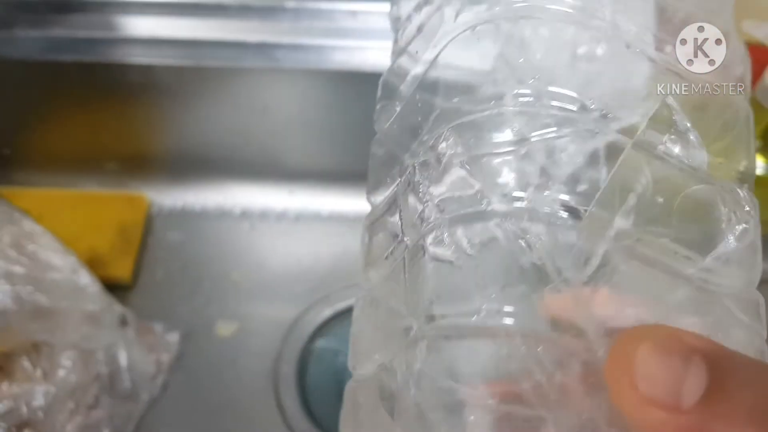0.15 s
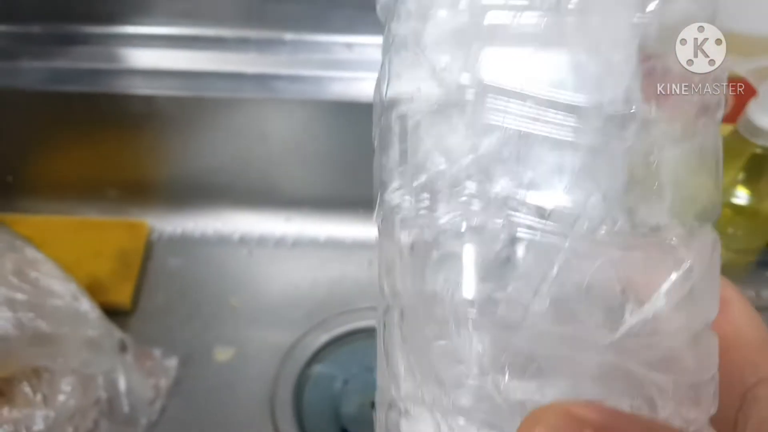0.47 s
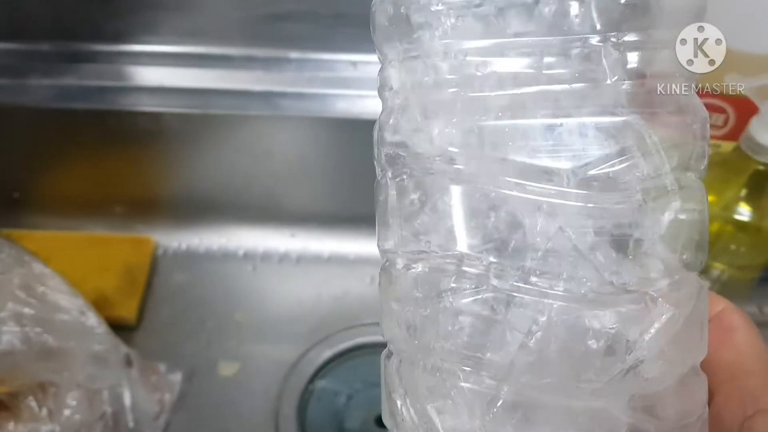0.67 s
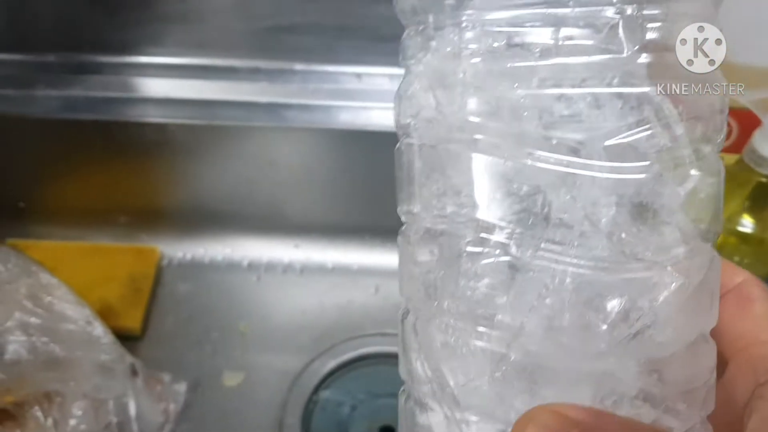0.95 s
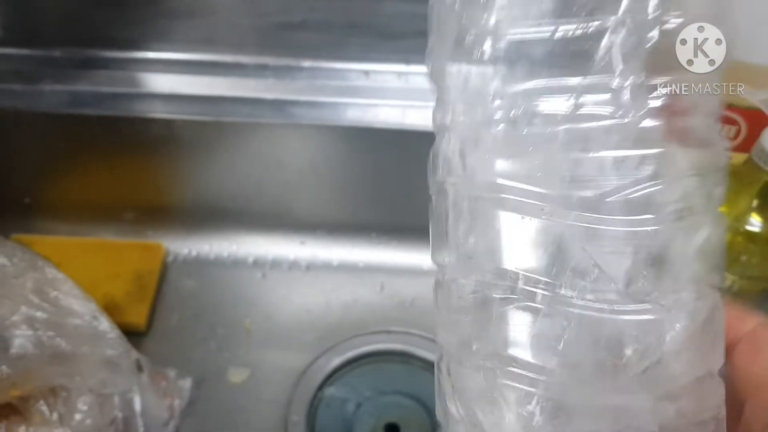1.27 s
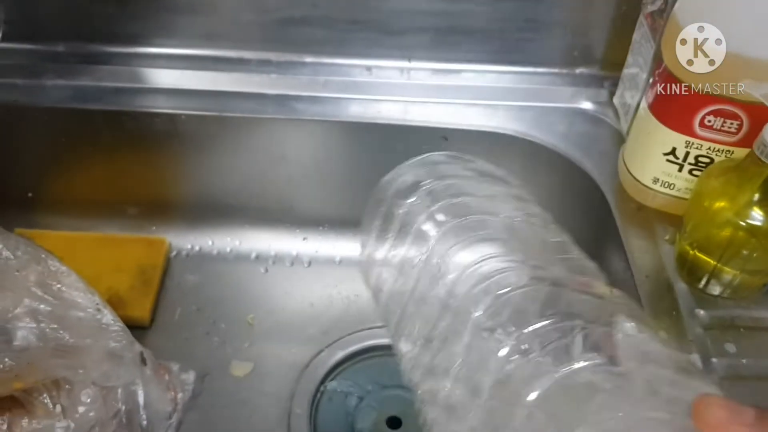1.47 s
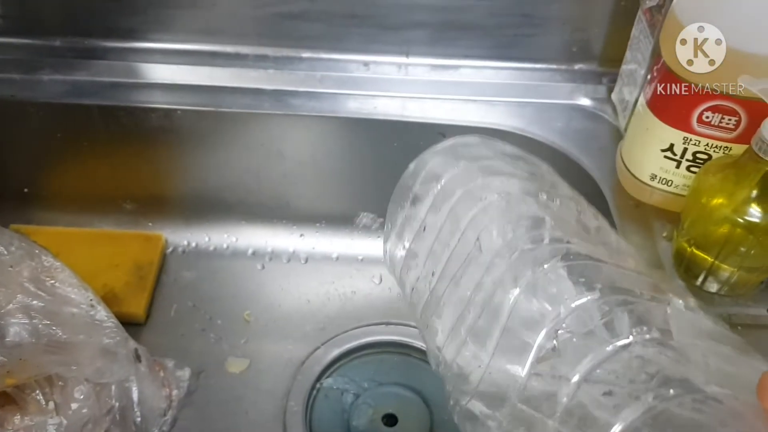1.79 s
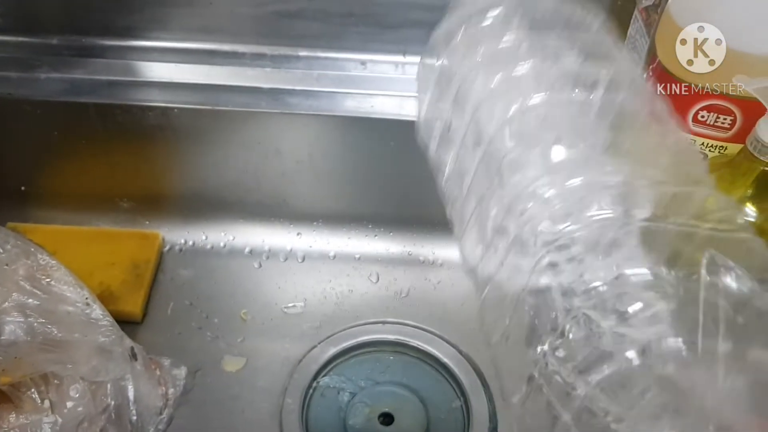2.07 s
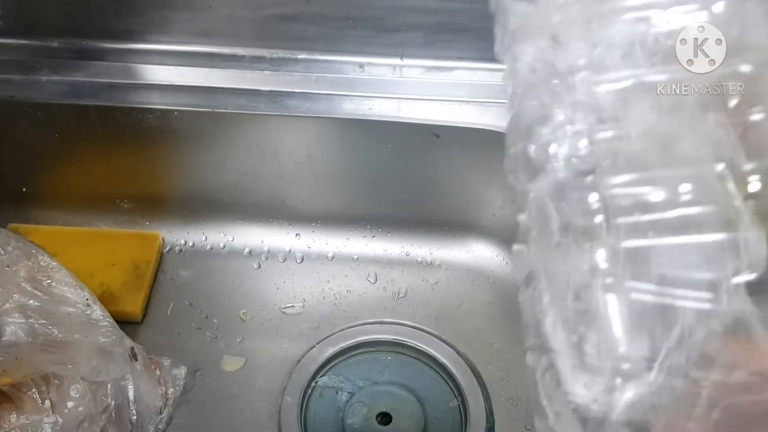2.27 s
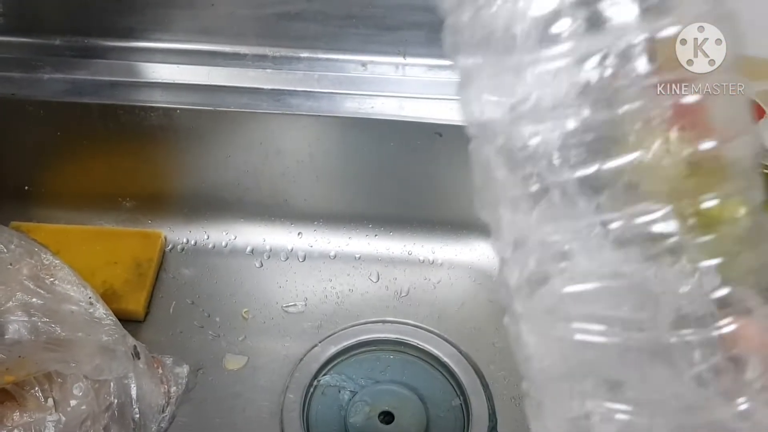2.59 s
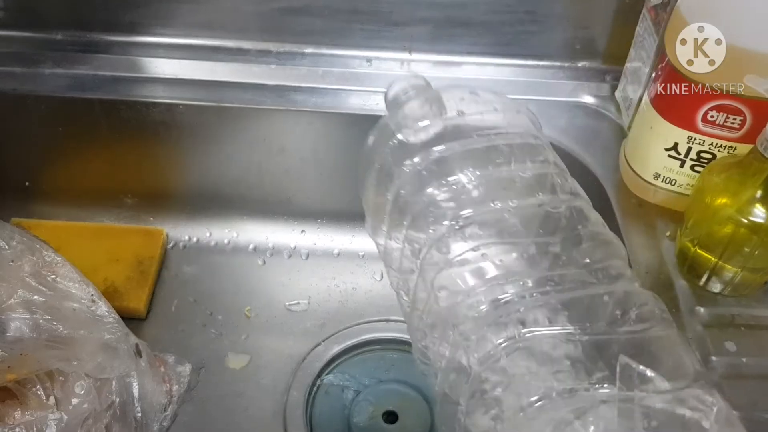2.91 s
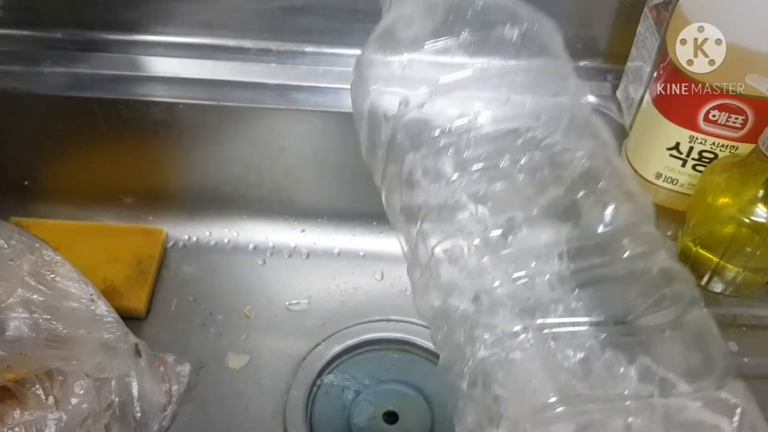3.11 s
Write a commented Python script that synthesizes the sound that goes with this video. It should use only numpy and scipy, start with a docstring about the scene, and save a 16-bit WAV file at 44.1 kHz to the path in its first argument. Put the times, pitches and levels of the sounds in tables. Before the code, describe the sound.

A plastic bottle of broken ice is shaken, clattering hollowly, pausing, then rattling again.

```python
"""Over a kitchen sink, broken ice slides and tumbles inside a thin plastic bottle shaken close to a phone.
A dense hail of small knocks rings the wall and the air in the bottle, and fine chips tick on top.
Bigger lumps knock at their own pitch, the ice cracks in bright bursts of noise, and the hand thumps softly.
The hard kitchen adds a short tail of fading noise over a faint steady hiss."""
import sys
import numpy as np
from scipy import signal
from scipy.fft import rfft, irfft, next_fast_len
from scipy.io import wavfile

SR = 44100
rng = np.random.default_rng(int(sys.argv[2]) if len(sys.argv) > 2 else 0)


def unload_wav(signal):
    """Save mono or channel-first audio to the path in sys.argv[1] as 16-bit WAV at rate SR, clipped to [-1, 1]."""
    wavfile.write(
        sys.argv[1],
        SR,
        np.round(np.clip(np.atleast_2d(signal).T, -1, 1) * 32767).astype(np.int16),
    )


N = 143325  # length in samples


def amp(db):
    """Turn dB into gain."""
    return 10 ** (np.asarray(db) / 20)


def unit(x):
    """Scale a sound to rms 1."""
    return x / np.sqrt(np.mean(x ** 2) + 1e-20)


def along(points, hz):
    """Read a curve of (Hz, value) points on a log frequency axis."""
    f, v = np.transpose(points)
    return np.interp(np.log(hz + 1), np.log(f + 1), v)


def filtered(x, response):
    """Multiply the spectrum of x by a complex response of frequency."""
    m = next_fast_len(len(x) + SR // 2)
    hz = np.fft.rfftfreq(m, 1 / SR)
    return irfft(rfft(x, m) * response(hz), m)[:len(x)]


def causal(spectrum):
    """Make a response with the given colour that starts only with the blow (minimum phase)."""
    def response(hz):
        log_gain = np.log(np.maximum(amp(along(spectrum, hz)), 1e-4))
        cepstrum = irfft(log_gain)
        half = len(cepstrum) // 2
        # Fold the second half onto the first, so nothing sounds ahead of the blow.
        cepstrum[1:half] *= 2
        cepstrum[half + 1:] = 0
        return np.exp(rfft(cepstrum))
    return response


def peak(hz, centre_hz, width_hz):
    """One resonance, with gain 1 at its centre."""
    return 1j * hz * width_hz / (centre_hz ** 2 - hz ** 2 + 1j * hz * width_hz)


def dying(t60, size):
    """A puff of noise of energy 1 that falls 60 dB in t60 seconds."""
    t = np.arange(size) / SR
    x = rng.standard_normal(size) * amp(-60 * t / t60)
    return x / np.linalg.norm(x)


BIGGEST = 3.5  # largest random contact, in spreads


def hail(per_s, spread_db):
    """Random contacts of very unequal size and either sign, rms 1."""
    hit = rng.random(N) < per_s / SR
    size = np.minimum(rng.exponential(size=N), BIGGEST)
    sign = rng.choice([-1, 1], N)
    return unit(hit * sign * amp(spread_db * size))


# The colour of a knock on the wall. Each row: frequency in Hz, relative level in dB per Hz.
WALL = [(250, -33.5), (430, -14), (470, -10), (524, -5), (599, -5.5), (763, -5), (931, -6.5), (1370, -7),
        (3200, -11.5), (5090, -26), (6000, -30.5), (7800, -68.5), (13200, -120)]
# The wall's ringing modes. Each row: frequency in Hz, width in Hz, level in dB over the wall.
MODES_OF_WALL = [(519, 9.3, 2.5), (693, 55, -4.5), (1010, 290, -9), (1070, 100, -9.5), (1240, 63, -10),
                 (1356, 90, -6.5), (1461, 19, 2.5), (1756, 180, -6), (2132, 88, -4)]
WALL_T60_S = 0.033
CLICK = 1.3  # size of the click against a rattle of energy 1
SPOT_SPREAD_DB, MODE_SCATTER = 1.5, 0.014  # mode level in dB and pitch as a fraction, from spot to spot


def spot_of_wall():
    """One spot of the wall answers with a click, a short rattle and the modes at new levels and pitches."""
    x = np.zeros(SR // 8)
    x[:4096] = dying(WALL_T60_S, size=4096)
    x[0] += CLICK

    def modes(hz):
        total = 1
        for centre_hz, width_hz, db in MODES_OF_WALL:
            gain = amp(db + SPOT_SPREAD_DB * rng.standard_normal())
            pitch_hz = centre_hz * (1 + MODE_SCATTER * rng.standard_normal())
            total = total + gain * peak(hz, pitch_hz, width_hz)
        return total

    x = filtered(filtered(x, causal(WALL)), modes)
    return x / np.linalg.norm(x)


# The air ringing along the bottle; its share changes as the bottle turns.
# Each row: time in seconds, level in dB over the wall.
COLUMN = [(0.0, 2.5), (1.5, 1.5), (1.62, -3.5), (2.2, -5), (2.36, 4), (2.6, 4), (2.72, -6), (3.25, 6)]
COLUMN_HZ, COLUMN_WIDTH_HZ = 760, 67
TUMBLES_PER_S, TUMBLE_SPREAD_DB = 3000, 2
SLIDE_SPOTS_PER_S, SPOTS_AT_ONCE = 25, 5  # the heap of ice wanders along the wall


def wall_and_column(blows, level_db, t, spots=20):
    """Every contact lands on one spot of the wall, and all of them ring the air column."""
    where = (SLIDE_SPOTS_PER_S * t + SPOTS_AT_ONCE * rng.random(N)).astype(int) % spots
    wall = np.zeros(N)
    for k in range(spots):
        wall += signal.fftconvolve(blows * amp(level_db) * (where == k), spot_of_wall())[:N]
    column = filtered(wall, lambda hz: peak(hz, COLUMN_HZ, COLUMN_WIDTH_HZ))
    return wall + amp(np.interp(t, *np.transpose(COLUMN))) * column


# The low sounds. Each row: time in seconds, level of the air in the bottle in dB, its belly in dB over that.
BASS = [(0.0, -100, -9.5), (0.16, -91, 11.5), (0.25, -41, -5), (0.31, -39.5, -8), (0.4, -49, 2),
        (0.42, -38.5, -2.5), (0.46, -45, -3.5), (0.52, -49, 12), (0.68, -44.5, -3), (0.8, -71, 15),
        (0.84, -56.5, -0.5), (0.97, -102.5, 6.5), (1.29, -100.5, -1), (1.44, -42, -5.5), (1.47, -63.5, 25),
        (1.51, -41.5, -2.5), (1.56, -41, -6.5), (1.71, -36, -8), (1.76, -41, -3.5), (1.81, -42.5, -3),
        (1.95, -57.5, 4.5), (2.12, -51, -3), (2.24, -50.5, -1.5), (2.47, -37.5, 0.5), (2.61, -56, 9.5),
        (2.75, -68.5, 8), (2.85, -46, -9), (2.909, -40.5, -9), (2.99, -61.5, 3), (3.02, -66.5, 8.5),
        (3.09, -61, 2.5), (3.25, -90, 6)]
# The colour of the bottle's belly. Each row: frequency in Hz, relative level in dB per Hz.
BELLY = [(82, -48), (140, -6.5), (219, -6.5), (247, -12.5), (297, -1), (430, -3.5), (560, -19.5),
         (950, -120)]
AIR_HZ, AIR_WIDTH_HZ = 110.1, 13


def belly_and_air(blows, t):
    """The same contacts pump the belly of the bottle and the air inside it."""
    def air(hz):
        return peak(hz, AIR_HZ, AIR_WIDTH_HZ) * peak(hz, AIR_HZ, 3 * AIR_WIDTH_HZ)

    s, air_db, belly_db = np.transpose(BASS)
    low = 0
    for db, response in [(air_db + belly_db, causal(BELLY)), (air_db, air)]:
        scale = 1 / np.std(filtered(blows, response))  # so that the table's dB are true levels
        low = low + scale * filtered(blows * amp(np.interp(t, s, db)), response)
    return low


# The fine chips, one list a bout. Each row: time in seconds, level in dB.
FINE = [
    [(0.0, -75), (0.16, -74.5), (0.202, -59.5), (0.216, -61), (0.25, -50.5), (0.386, -46.5), (0.426, -43.5),
     (0.484, -47.5), (0.54, -43.5), (0.59, -46.5), (0.674, -45.5), (0.77, -54.5), (0.798, -55.5),
     (0.944, -74), (0.952, -71.5), (1.0, -85)],
    [(1.01, -89), (1.05, -95), (1.058, -81), (1.094, -77), (1.124, -95), (1.298, -99), (1.326, -73.5),
     (1.376, -79), (1.402, -59.5), (1.454, -42), (1.532, -39.5), (1.564, -44.5), (1.828, -41), (1.945, -54)],
    [(2.01, -56), (2.11, -60), (2.12, -52.5), (2.158, -59.5), (2.182, -52), (2.274, -58), (2.338, -45.5),
     (2.464, -40), (2.544, -44), (2.6, -40.5), (2.634, -50.5), (2.81, -57.5), (2.986, -55), (3.042, -68),
     (3.124, -62.5), (3.228, -103), (3.25, -89)],
]
# The colour of the chips. Each row: frequency in Hz, relative level in dB per Hz.
CHIPS = [(2470, -24), (4200, -0.5), (5080, -19.5), (5730, -4.5), (8030, -7), (9870, -4.5), (11700, -19.5),
         (14800, -28), (15400, -23.5)]
CHIPS_PER_S, CHIP_SPREAD_DB, CHIP_T60_S = 2500, 4, 0.066
# Above SHEEN_HZ the chips also follow the tumbling: they fade faster below the level of a hard shake.
SHEEN_HZ, SHEEN_GROWS, HARD_DB = 11900, 0.33, -24.5  # SHEEN_GROWS is in dB per dB


def fine_chips(level_db, t, spots=20):
    """Tiny chips tick as short puffs of bright noise."""
    ticks = hail(CHIPS_PER_S, CHIP_SPREAD_DB)
    where = rng.integers(spots, size=N)
    chips = np.zeros(N)
    for k in range(spots):
        chips += signal.fftconvolve(ticks * (where == k), dying(CHIP_T60_S, size=2048))[:N]
    chips = unit(filtered(chips, causal(CHIPS)))
    sheen = filtered(chips, lambda hz: hz > SHEEN_HZ)
    chips = chips - sheen + sheen * amp(SHEEN_GROWS * (level_db - HARD_DB))
    return chips * amp(np.interp(t, *np.concatenate(FINE).T))


# The shaking, in four lists over three bouts: the middle two lists together make up the second bout. Each row:
# time in seconds, tumbling level in dB.
SHAKE = [
    [(0.0, -74), (0.028, -75), (0.034, -68.5), (0.074, -69), (0.134, -51), (0.166, -50.5), (0.192, -36.5),
     (0.208, -43), (0.242, -30), (0.412, -23.5), (0.476, -28), (0.542, -25), (0.708, -28.5), (0.716, -34),
     (0.806, -35), (0.82, -44), (0.886, -50), (1.03, -81.5)],
    [(1.035, -80.5), (1.057, -61.5), (1.069, -67.5), (1.085, -65.5), (1.119, -81), (1.13, -66.5),
     (1.14, -93), (1.29, -100), (1.313, -80), (1.333, -68), (1.351, -77), (1.369, -69), (1.39, -56)],
    [(1.395, -53), (1.399, -43), (1.471, -24.5), (1.549, -27.5), (1.561, -27.5), (1.685, -27), (1.705, -24),
     (1.899, -28.5), (1.937, -38.5), (1.955, -36.5), (2.023, -43.5), (2.05, -42.5)],
    [(2.055, -40.5), (2.067, -47.5), (2.127, -35.5), (2.287, -38.5), (2.317, -31.5), (2.343, -30),
     (2.433, -23.5), (2.579, -27), (2.589, -25.5), (2.629, -31.5), (2.815, -40.5), (2.849, -35),
     (2.863, -38.5), (2.899, -38), (2.979, -38), (3.049, -48), (3.115, -46), (3.239, -77), (3.25, -57)],
]


def tumbling():
    """One hail of contacts drives the wall and the low sounds; chips tick on top."""
    t = np.arange(N) / SR
    level_db = np.interp(t, *np.concatenate(SHAKE).T)
    blows = hail(TUMBLES_PER_S, TUMBLE_SPREAD_DB)
    return wall_and_column(blows, level_db, t) + belly_and_air(blows, t) + fine_chips(level_db, t)


# The bigger lumps. Each row: start in seconds, peak level in dB, pitch of the lump in Hz.
KNOCKS = [(0.033, -57.5, 1290), (0.109, -46, 850), (0.133, -41, 820), (0.19, -27.5, 1240),
          (0.222, -29.5, 744), (0.296, -20, 1980), (0.315, -20, 805), (0.334, -21, 780),
          (0.371, -14.5, 1880), (0.379, -20, 1500), (0.417, -17, 730), (0.4215, -12, 805),
          (0.546, -13.5, 750), (0.629, -16, 1320), (0.659, -16.5, 720), (0.77, -29, 1460),
          (1.054, -55, 1786), (1.09, -64, 1500), (1.077, -63, 750), (1.311, -57, 743), (1.324, -56, 714),
          (1.337, -63, 720), (1.351, -56, 790), (1.398, -33, 1070), (1.419, -32, 746), (1.441, -24, 1610),
          (1.456, -18, 1620), (1.469, -20, 519), (1.484, -19, 820), (1.502, -20.5, 900), (1.526, -23, 990),
          (1.542, -18.5, 790), (1.5705, -23, 2160), (1.707, -25, 900), (1.742, -18, 684),
          (1.796, -19, 2480), (1.8255, -16, 2700), (2.115, -32, 505), (2.177, -30.5, 714),
          (2.25, -30.5, 780), (2.296, -29, 745), (2.31, -20.5, 1110), (2.381, -28, 750), (2.398, -29, 760),
          (2.412, -16, 905), (2.422, -21, 790), (2.431, -21.5, 955), (2.444, -19, 1070),
          (2.494, -14.5, 790), (2.521, -19.5, 507), (2.544, -17, 745), (2.589, -17.5, 866),
          (2.667, -20.5, 800), (2.882, -26, 900), (2.914, -30, 1530), (2.972, -28.5, 1010),
          (3.108, -33.5, 1240)]
LUMP_DB, LUMP_Q, LUMP_RISE_S = 11.5, 6, 0.00065  # ring in dB over the wall, its sharpness, rise time
KNOCK_SOFT_HZ = 2180  # the blow is duller above this


def knocks():
    """Bigger lumps strike the wall and ring at their own pitch; their longer contact dulls the blow."""
    out = np.zeros(N + SR)
    for s, db, lump_hz in KNOCKS:
        def lump(hz):
            ring = 1 + amp(LUMP_DB) * peak(hz, lump_hz, lump_hz / LUMP_Q)
            return ring * (1 + 1j * hz / KNOCK_SOFT_HZ) ** -2

        x = filtered(spot_of_wall(), lump)
        x = x * (1 - np.exp(-np.arange(len(x)) / SR / LUMP_RISE_S))
        out[round(s * SR):][:len(x)] += amp(db) * x / abs(x).max()
    return out[:N]


# The moments the ice splits. Each row: start in seconds, peak level in dB.
CRACKS = [(0.177, -58.5), (0.192, -55.5), (0.225, -55), (0.239, -48), (0.271, -39), (0.376, -32.5),
          (0.4356, -30.5), (0.528, -35), (0.7985, -39.5), (1.0575, -65), (1.401, -54), (1.429, -39),
          (1.4461, -42), (1.4955, -32), (1.8203, -32), (1.953, -20.5), (2.0435, -43.5), (2.0683, -43.5),
          (2.1176, -39.5), (2.3242, -36), (2.881, -41.5), (2.9621, -41), (3.0815, -51)]
# The colour of a crack. Each row: frequency in Hz, relative level in dB per Hz.
CRACK = [(600, -26.5), (1200, -10), (2300, 2.5), (4400, 0.5), (5500, -4), (7400, 1), (8500, -3), (9600, 6),
         (11500, -12.5), (15500, -22.5)]
CRACK_RISE_S, CRACK_T60_S = 0.0017, 0.065


def cracks():
    """The ice splits in bright bursts of noise that rise fast and die away."""
    out, t = np.zeros(N + SR), np.arange(SR // 5) / SR
    for s, db in CRACKS:
        burst = filtered(rng.standard_normal(len(t)), causal(CRACK))
        burst = burst * amp(-60 * t / CRACK_T60_S) * (1 - np.exp(-t / CRACK_RISE_S))
        out[round(s * SR):][:len(t)] += amp(db) * burst / abs(burst).max()
    return out[:N]


# The grip shifts. Each row: start in seconds, level at the start of the fade in dB, pitch in Hz.
THUMPS = [(0.237, -28, 372), (0.238, -32, 220), (1.361, -53, 70)]
THUMP_CYCLES = 15  # cycles to fall 60 dB


def thumps():
    """The hand pushes softly on the wall: low, fading sine tones."""
    out, t = np.zeros(N + SR), np.arange(SR // 4) / SR
    for s, db, hz in THUMPS:
        fade = amp(db - 60 * t * hz / THUMP_CYCLES)
        out[round(s * SR):][:len(t)] += fade * np.sin(2 * np.pi * hz * t)
    return out[:N]


# How long the room rings. Each row: frequency in Hz, time to fall 60 dB in seconds.
KITCHEN = [(200, 0.043), (2000, 0.42), (10000, 0.2)]
KITCHEN_DB = -13.5


def kitchen(x):
    """The room answers with a noise tail in which each frequency dies at its own speed."""
    hz, t, z = signal.stft(rng.standard_normal(SR // 2), SR, nperseg=256)
    fade = amp(-60 * t / along(KITCHEN, hz)[:, None])
    tail = signal.istft(z * fade, SR, nperseg=256)[1]
    late = np.pad(x, (300, 0))  # the answer comes 300 samples later
    return amp(KITCHEN_DB) * signal.fftconvolve(late, tail / np.linalg.norm(tail))[:N]


# The colour of the hiss. Each row: frequency in Hz, relative level in dB per Hz.
HISS = [(30, -7.5), (60, 6.5), (240, -13), (310, -12.5), (750, -16), (1170, -12), (2580, -29), (3400, -6),
        (4830, -24.5), (7000, -13.5), (10000, -10.5), (11000, -21), (15500, -29)]
HISS_DB = -83


def faint_hiss():
    """Steady noise shaped to a fixed colour."""
    noise = filtered(rng.standard_normal(N), lambda hz: amp(along(HISS, hz)))
    return amp(HISS_DB) * unit(noise)


def scene():
    """The bottle, the room's answer to it, and the hiss."""
    bottle = tumbling() + knocks() + cracks() + thumps()
    return (bottle + kitchen(bottle) + faint_hiss())[None]


LOW_CUT_HZ, TOP_HZ = 55, 15550


def record(dry):
    """The phone cuts the deep bass and keeps nothing above its band limit."""
    def phone(hz):
        return (hz < TOP_HZ) * (1j * hz / (LOW_CUT_HZ + 1j * hz)) ** 2

    return filtered(dry[0], phone)[None]


dry = scene()
out = record(dry)
unload_wav(out)
```